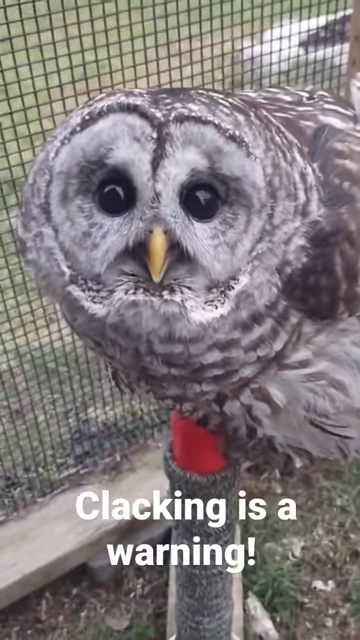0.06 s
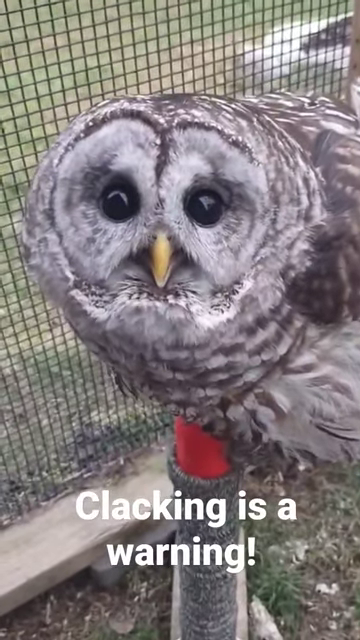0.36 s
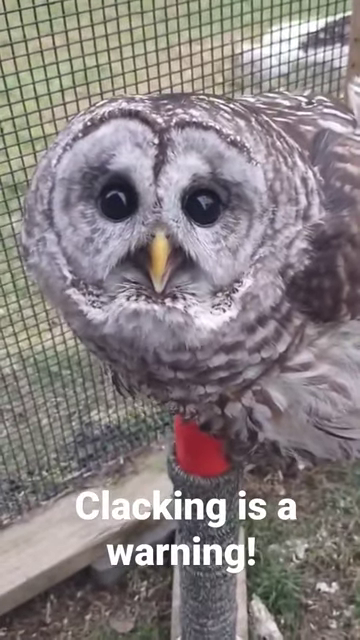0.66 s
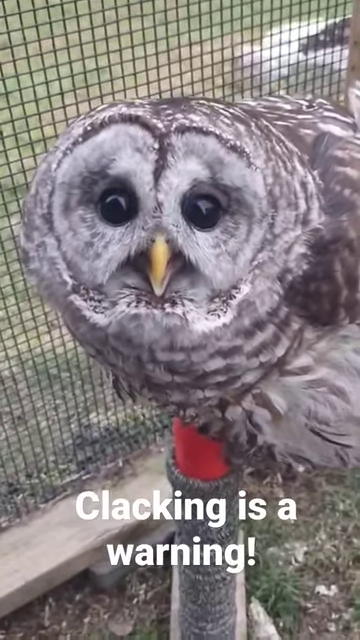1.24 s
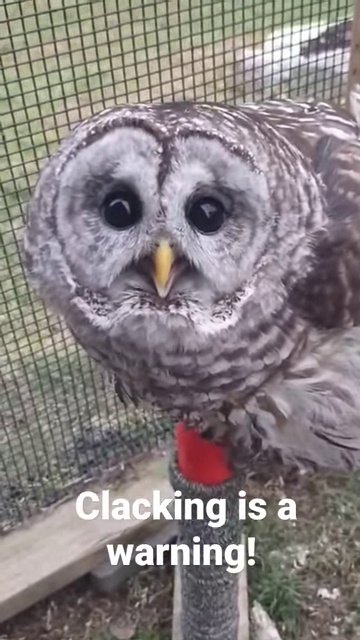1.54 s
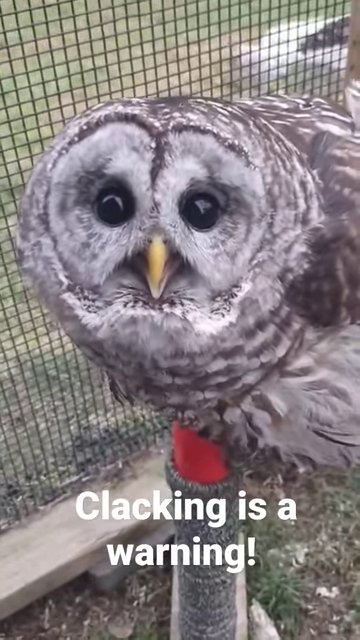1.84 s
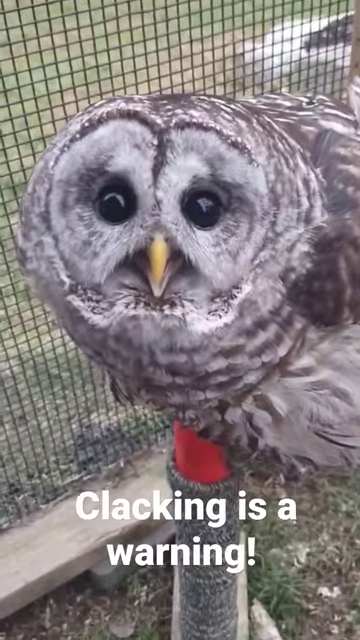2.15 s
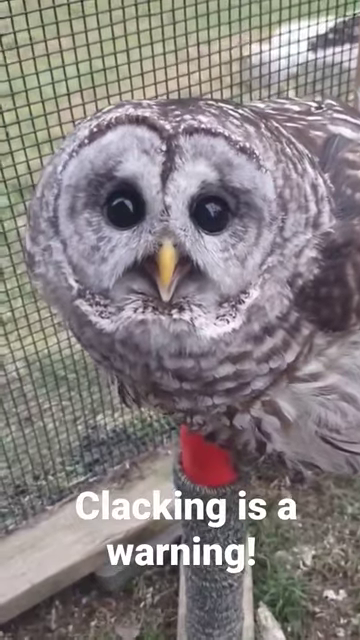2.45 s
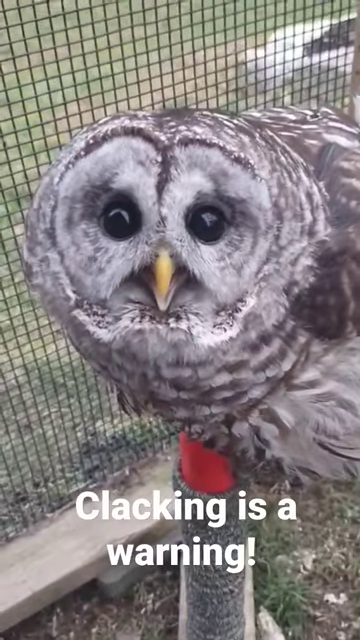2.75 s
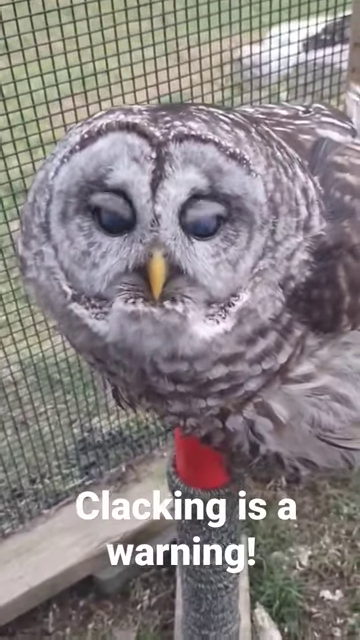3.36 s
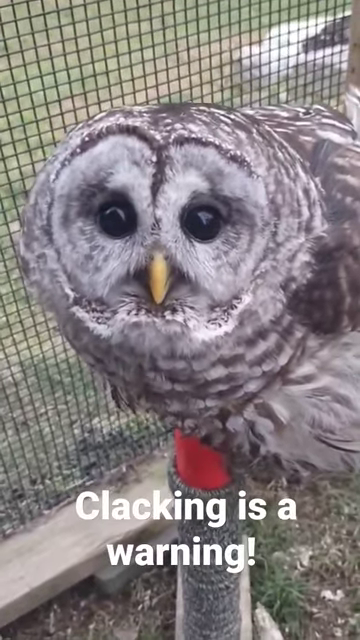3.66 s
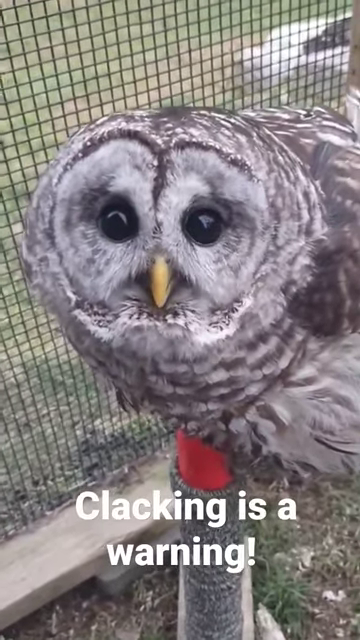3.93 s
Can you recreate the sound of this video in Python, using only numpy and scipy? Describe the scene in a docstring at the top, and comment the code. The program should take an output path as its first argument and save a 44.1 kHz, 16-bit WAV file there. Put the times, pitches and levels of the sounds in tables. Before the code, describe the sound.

A single sharp clack of an owl's bill sounds close by in an outdoor aviary. It comes late, after a quiet stretch of soft air and far-off engine hum, and a faint rustle follows.

```python
"""A far engine drones under soft outdoor air, its exhaust throbbing as the speed hunts.
A faint high tick sounds early on, then thin whines drift past in the distance.
At 2.6 s an owl close by parts its bill with a tiny tick, while a second hum swells and rises.
At 3.5 s the bill touches lightly and snaps shut: the horn edges scrape, bill and mouth ring for
a few milliseconds, and the clack scatters round a wooden aviary. A soft rustle follows."""
import sys
import numpy as np
from scipy import signal
from scipy.fft import rfft, irfft
from scipy.io import wavfile
from scipy.ndimage import uniform_filter1d

SR = 44100
rng = np.random.default_rng(int(sys.argv[2]) if len(sys.argv) > 2 else 0)


def waveform_to_disk(signal):
    """Save audio, clipped to [-1, 1], as 16-bit WAV at the path in sys.argv[1]."""
    frames = np.transpose(np.atleast_2d(signal))
    scaled = np.clip(frames, -1, 1) * 32767
    samples = np.round(scaled).astype(np.int16)
    wavfile.write(sys.argv[1], SR, samples)


N = 176400

# stereo image of every noise layer: freq_hz, left_right_correlation
NOISE_CORRELATION = [(60, 1), (290, 0.73), (640, .45), (1400, 0), (15000, 0.064)]
# colour of the outdoor air: freq_hz, relative_db
AIR_COLOUR = [(30, -12), (300, 2.5), (500, -2), (800, -0.5), (1200, -4), (1350, -1), (1480, -7),
              (1750, -7.5), (2500, -13.5), (5000, -22.5), (9000, -26), (15500, -27.5)]
# fader ride on the air: time_s, level_db
AIR_RIDE = [(0, -67.5), (.7, -67.5), (1.3, -67.5), (1.75, -67.5), (2.15, -67.5), (3.1, -67), (3.7, -65),
            (4, -68.5)]
# distant whines: start_s, end_s, pitch_hz, gain_db
WHINE_PASSES = [(0.83, 1.69, 799, -75), (1.15, 1.8, 699, -78), (1.82, 2.24, 393.4, -75),
                (1.954, 2.946, 1330, -81)]
# breathy band around each whine: freq_hz, relative_db
WHINE_COLOUR = [(450, -34), (690, -8), (810, 2.5), (1000, -5), (1400, -7.5), (2200, -37)]
# body of the swelling hum: freq_hz, relative_db
HUM_COLOUR = [(120, -25), (200, -14.5), (290, 10), (385, 4.5), (440, -5.5), (530, 5), (700, -25.5),
              (1500, -61)]
# swell of the hum: time_s, level_db
HUM_RIDE = [(0, -97), (2.5, -80.5), (3.0, -74), (3.35, -66), (3.75, -64), (4, -67.5)]
# rising tone inside the hum: time_s, pitch_hz
HUM_PITCH = [(2.6, 297.6), (3.3, 326), (4, 362.6)]

# hunting engine speed: time_s, cycle_rate_hz
ENGINE_SPEED = [(0, 24.4), (.18, 24.25), (.42, 23.9), (.9, 24.55), (1.3, 24.85), (1.72, 24.22),
                (2.25, 24.62), (2.8, 24.58), (3.45, 24.12), (4, 24.15)]
# phase spread of the exhaust harmonics, throbbing stroke by stroke when small: time_s, spread_turns
STROKE_SMEAR = [(0, 0.34), (.22, 1), (.33, 0.11), (.53, 0.18), (.72, 0.82), (4, 0.6)]
# rides on exhaust harmonics 2, 5, 7 and 10: time_s, level_db
SECOND_RIDE = [(0, -76), (1.0, -69.5), (2.0, -66.5), (3.2, -72.5), (4, -73.5)]
FIFTH_RIDE = [(0.04, -55), (0.25, -55), (0.34, -64.5), (0.61, -61.5), (0.69, -57), (1.38, -57.5),
              (1.41, -60), (1.87, -56), (1.97, -60.5), (3.5, -55.5), (3.52, -53.5), (3.96, -56.5)]
SEVENTH_RIDE = [(0.04, -59), (0.13, -58), (0.68, -68), (1.34, -64), (2.16, -67), (2.38, -60.5), (3.05, -78),
                (3.58, -55.5), (3.92, -72.5)]
TENTH_RIDE = [(0.0, -56.5), (0.23, -55), (0.49, -70.5), (0.87, -64.5), (0.93, -58), (1.28, -57),
              (1.63, -66), (1.96, -54.5), (2.57, -58.5), (2.69, -70), (2.73, -58), (2.79, -72.5),
              (3.33, -58), (3.39, -66), (3.42, -58), (3.85, -58.5)]
# quieter exhaust harmonics: harmonic_number, level_db
WEAK_HARMONICS = [(3, -73), (4, -74), (6, -70), (8, -68.5), (9, -74.5), (11, -69.5), (12, -83)]
# rough exhaust rumble: freq_hz, relative_db
RUMBLE_COLOUR = [(22, -51), (45, -14), (75, -14.5), (115, 7), (180, 2), (255, 6.5), (310, -13), (450, -38)]

# faint high tick: freq_hz, relative_db
TICK_COLOUR = [(5000, -30), (7200, -2), (8500, 0), (9600, -4), (11000, -25)]
# soft rustle: freq_hz, relative_db
RUSTLE_COLOUR = [(600, -17), (1300, 9.5), (1700, 1.5), (2500, 5), (3200, -7.5), (4200, -9.5), (7000, -34.5)]

# reverb of the aviary: freq_hz, relative_db, t60_s, pan_db
AVIARY_BANDS = [(250, -17.5, .15, 7.5), (428, 0, 0.11, 4), (590, 4, 0.16, 3.5), (880, 1.5, 0.13, -0.5),
                (1500, 1.5, 0.155, 4), (2420, 0, .145, 0.5), (3470, -5, 0.125, 3.5),
                (6000, -1.5, 0.084, 6.5), (9200, -10, 0.083, 14.5), (11600, -30.5, 0.13, 4.5),
                (15000, -21.5, .1, 9)]
# faint ring of timber and mesh: pitch_hz, t60_s, gain_db
FRAME_RINGS = [(612, 0.19, -51.5), (887, 0.19, -47), (1000, 0.15, -39), (1305, 0.2, -44),
               (2400, .15, -41.5), (1558, .2, -47)]
# early echoes off perch and frame: delay_s, gain_db, pan_db
PERCH_ECHOES = [(.0035, -21.5, 10.5), (.0046, -24.5, 0.5), (.0084, -21, -14.5), (0.017, -24, 5.5)]
# scrape of the horn edges: freq_hz, relative_db
SCRAPE_COLOUR = [(2000, -16.5), (6000, -3), (9000, -0.5), (12000, -8), (14800, -4), (16000, -12.5)]
# resonances of bill and mouth: pitch_hz, width_hz, gain_db, pan_db
BILL_MODES = [(660, 280, 10.5, -7), (918, 280, 15, 2), (1310, 270, 15.5, -4.5), (1720, 420, 13, -1),
              (2500, 350, 14.5, 5), (3520, 500, 14, 6.5), (4470, 550, 6.5, 0), (5350, 750, 4.5, 12),
              (6240, 690, 4, 3.5), (8840, 860, -5.5, 13), (10790, 800, -14.5, -5)]
# staggered attack as tip, mouth and edges sound in turn: freq_hz, delay_s
CLOSING_DELAY = [(1800, .0001), (2400, .0008), (6500, .0007), (8200, -.0001)]
# parting tick, light touch, full snap: start_s, gain_db, scrape_db, pan_db, low_cut_hz, high_cut_hz
BILL_HITS = [(2.617, -52.5, -88, 4, 890, 7000), (3.4461, -28, -54.5, 0, 1050, 2000),
             (3.506, 0.25, -41.5, 1.4, 420, 24000)]

TIME = np.arange(N) / SR


def undb(db):
    """Decibels to gain."""
    return 10 ** (np.asarray(db) / 20)


def pan(db):
    """Stereo gains that put the left side db above the right."""
    return undb(np.array([[db], [-db]]) / 2)


def curve(rows):
    """An automation lane: a time_s, value table read at every sample."""
    return np.interp(TIME, *np.array(rows, float).T)


def over_hz(rows, hz, column=1):
    """One column of a table, read on a log-frequency axis."""
    rows = np.array(rows, float)
    return np.interp(np.log(hz + 1), np.log(rows[:, 0]), rows[:, column])


def drift(rate_hz):
    """Smooth random modulation with a spread of 1."""
    hold = int(SR / rate_hz)
    steps = rng.standard_normal(N)[np.arange(N) // hold]
    smooth = uniform_filter1d(uniform_filter1d(steps, hold), hold)
    return (smooth - smooth.mean()) / smooth.std()


def swell(peak_s, width_s):
    """A bell-shaped envelope."""
    return np.exp(-((TIME - peak_s) / width_s) ** 2 / 2)


def noise(colour):
    """Coloured stereo noise of rms 1, centred in the bass and wide in the treble."""
    hz = np.fft.rfftfreq(N, 1 / SR)
    mid, side = rfft(rng.standard_normal((2, N)))
    alike = np.clip(over_hz(NOISE_CORRELATION, hz), -1, 1)
    stereo = mid * np.sqrt(1 + alike) + side * np.sqrt(1 - alike) * np.array([[1], [-1]])
    coloured = irfft(stereo * undb(over_hz(colour, hz)), N)
    return coloured / coloured.std()


def wobbly_tone(hz, wobble=0.012, rough_db=2):
    """A sine of rms near 1 that wobbles in pitch and level."""
    level = np.sqrt(2) * undb(rough_db * drift(40))
    pitch_hz = hz * (1 + wobble * drift(35))
    return level * np.sin(2 * np.pi * np.cumsum(pitch_hz) / SR)


def outdoor_air():
    """A soft, nearly steady bed of outdoor noise."""
    return noise(AIR_COLOUR) * undb(curve(AIR_RIDE) + 0.2 * drift(5.8)) * pan(1.2)


def whines(fade_s=0.12, trim_db=-1.5):
    """Distant tones fade in and out, each carrying a band of noise."""
    breath = noise(WHINE_COLOUR)
    out = 0
    for start_s, end_s, pitch_hz, gain_db in WHINE_PASSES:
        fade = np.clip(np.minimum(TIME - start_s, end_s - TIME) / fade_s, 0, 1)
        out += (wobbly_tone(pitch_hz) + breath) * undb(gain_db + trim_db) * fade
    return out


def hum(tone_db=-6):
    """A low hum swells and its tone climbs, like a vehicle gathering speed."""
    body = noise(HUM_COLOUR)
    tone = undb(tone_db) * wobbly_tone(curve(HUM_PITCH))
    return (body + tone) * undb(curve(HUM_RIDE))


def engine(first_stroke_s=0.003, flutter_db=0.57, waver_db=2.5, rumble_db=-64.5, puff_depth=0.17):
    """Exhaust harmonics follow the speed and fade in and out on their long way, over a pulsing rumble."""
    turns = np.cumsum(curve(ENGINE_SPEED)) / SR - first_stroke_s * ENGINE_SPEED[0][1]
    smear = curve(STROKE_SMEAR)

    def harmonic(number, level_db):
        level = np.sqrt(2) * undb(level_db + flutter_db * drift(16))
        return level * np.cos(2 * np.pi * (number * turns + smear * (rng.random() - 0.5)))

    rides = (5, FIFTH_RIDE), (7, SEVENTH_RIDE), (10, TENTH_RIDE), (2, SECOND_RIDE)
    drone = sum(harmonic(number, curve(ride)) for number, ride in rides)
    filler = sum(harmonic(number, db + waver_db * drift(3)) for number, db in WEAK_HARMONICS)
    puffs = 1 + puff_depth * np.cos(2 * np.pi * turns)
    rumble = undb(rumble_db) * noise(RUMBLE_COLOUR) * puffs
    return pan(1.2) * (drone + filler + rumble)


def high_tick(level_db=-78):
    """One faint pinprick of treble noise."""
    return noise(TICK_COLOUR) * undb(level_db) * swell(peak_s=0.178, width_s=0.006)


def rustle(level_db=-73):
    """A soft, flickering swell of midrange noise after the snap."""
    return noise(RUSTLE_COLOUR) * undb(level_db + 1.5 * drift(25)) * swell(peak_s=3.82, width_s=0.3)


def aviary_tail(t, wash_db=-29, build_s=0.011, wide_above_hz=550, late_db=-18.5, late_stretch=1.7):
    """Dense reflections build up and die away band by band; timber and mesh ring on faintly."""
    def decay(t60_s):
        return np.exp(-np.log(1000) * t / t60_s)

    hz = np.fft.rfftfreq(len(t), 1 / SR)
    colour = undb(over_hz(AVIARY_BANDS, hz))
    balance = undb(np.array([[1], [-1]]) * over_hz(AVIARY_BANDS, hz, column=3) / 2)
    centre = rfft(rng.standard_normal(len(t)))
    wide = rfft(rng.standard_normal((2, len(t))))
    alike = 1 / (1 + (hz / wide_above_hz) ** 2)
    stereo = centre * np.sqrt(alike) + wide * np.sqrt(1 - alike)
    spectrum = stereo * balance * colour / np.sqrt(np.mean(colour ** 2))
    bands_hz, _, t60s, _ = np.array(AVIARY_BANDS).T
    wash = 0
    for solo, t60_s in zip(np.eye(len(bands_hz)), t60s):
        band = np.interp(np.log(hz + 1), np.log(bands_hz), solo)
        far_surfaces = undb(late_db) * decay(t60_s * late_stretch)
        wash += irfft(spectrum * band, len(t)) * (decay(t60_s) + far_surfaces)
    rings = sum(undb(gain_db) * decay(t60_s) * np.sin(2 * np.pi * (pitch_hz * t + rng.random()))
                for pitch_hz, t60_s, gain_db in FRAME_RINGS)
    grain = undb(0.5 * drift(780)[:len(t)])  # single reflections poke out of the wash
    return (undb(wash_db) * wash * grain + rings) * (1 - np.exp(-t / build_s))


def bill_clack(t, low_cut_hz, high_cut_hz, left_lag_s=0.00014):
    """Tip, mouth and edges ring their damped resonances in turn; nearby timber returns a few echoes."""
    def delay(seconds):
        return np.exp(-2j * np.pi * hz * seconds)

    hz = np.fft.rfftfreq(len(t), 1 / SR)
    power = sum((pan(pan_db) * undb(gain_db) / (1 + 2 * ((hz - pitch_hz) / width_hz) ** 2)) ** 2
                for pitch_hz, width_hz, gain_db, pan_db in BILL_MODES)
    low_cut = 1 / (1 + (low_cut_hz / (hz + 20)) ** 8)
    high_cut = 1 / (1 + (hz / high_cut_hz) ** 2)
    magnitude = np.sqrt(power * low_cut * high_cut)
    # minimum phase keeps the attack hard, with all the ring after it
    cepstrum = irfft(np.log(magnitude), len(t))
    strike = np.exp(rfft(cepstrum * (1 + np.sign(np.fft.fftfreq(len(t))))))
    stagger = np.exp(-2j * np.pi * np.cumsum(over_hz(CLOSING_DELAY, hz)) * hz[1])
    echoes = sum(pan(pan_db) * undb(db) * delay(delay_s) for delay_s, db, pan_db in PERCH_ECHOES)
    ears = np.array([delay(left_lag_s), delay(0)])
    return -irfft(strike * stagger * (1 + echoes) * ears, len(t))


def owl(drag_db=-17, drag_s=0.02, rough_db=4):
    """Each move of the bill scrapes, clacks and scatters; a light touch is thinner than the full snap."""
    t = np.arange(SR // 2) / SR
    tail = aviary_tail(t)
    scrape = noise(SCRAPE_COLOUR)
    scratch = undb(drag_db + rough_db * drift(400))
    out = np.zeros((2, N + len(t)))
    for start_s, gain_db, scrape_db, pan_db, low_cut_hz, high_cut_hz in BILL_HITS:
        start = int(start_s * SR)
        clack = bill_clack(t, low_cut_hz, high_cut_hz)
        out[:, start:start + len(t)] += undb(gain_db) * pan(pan_db) * (clack + tail)
        # the horn edges graze just before they meet, then drag on scratchily
        graze = swell(peak_s=start_s - 0.0001, width_s=0.00095)
        drag = scratch * (TIME > start_s) * np.exp(-abs(TIME - start_s) / drag_s)
        out[:, :N] += undb(scrape_db) * scrape * (graze + drag)
    return out[:, :N]


def scene():
    """The owl up front, everything else far back in the mix."""
    return owl() + engine() + outdoor_air() + whines() + hum() + high_tick() + rustle()


def record(dry):
    """A steep high cut takes off the treble above 15.6 kHz."""
    return signal.sosfilt(signal.ellip(8, 0.2, 70, 15600, fs=SR, output="sos"), dry)


dry = scene()
out = record(dry)
waveform_to_disk(out)
```